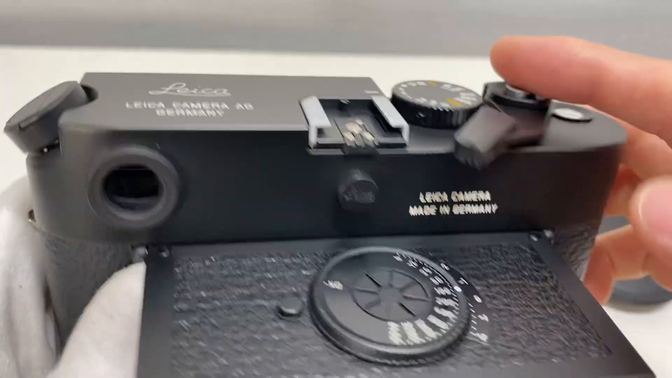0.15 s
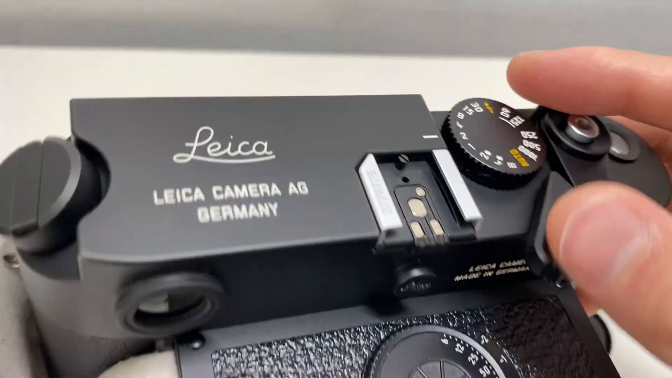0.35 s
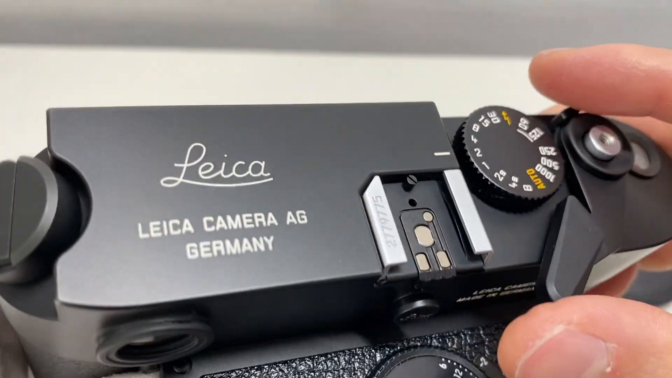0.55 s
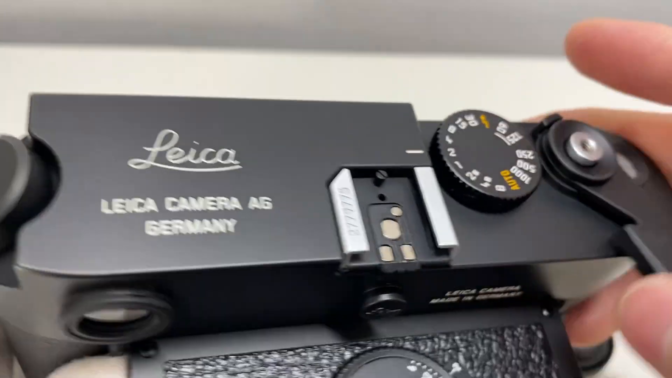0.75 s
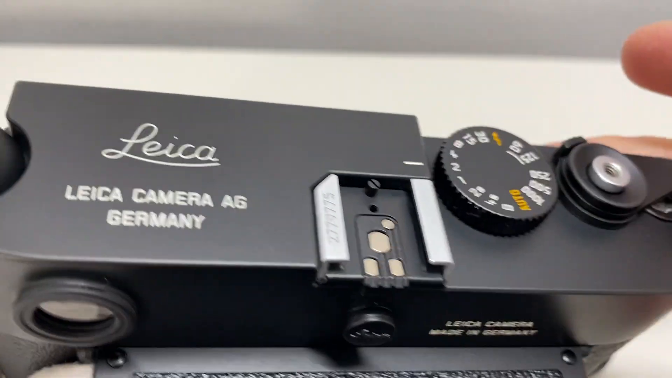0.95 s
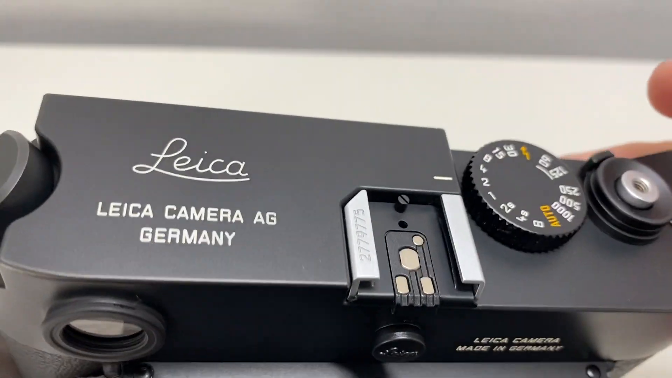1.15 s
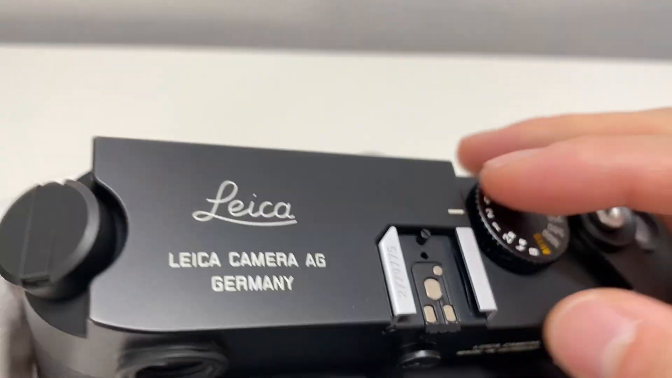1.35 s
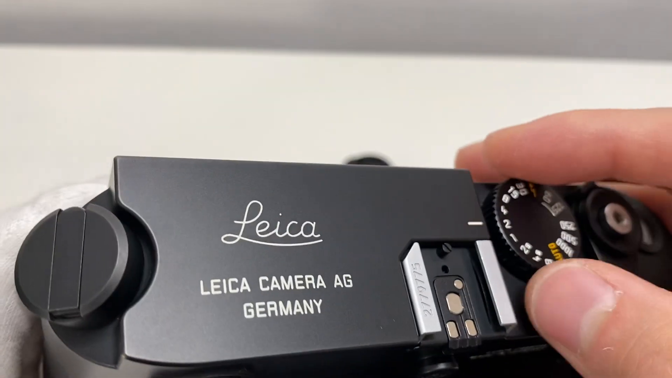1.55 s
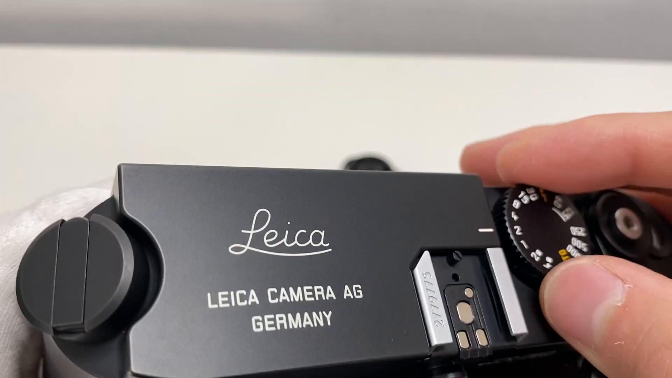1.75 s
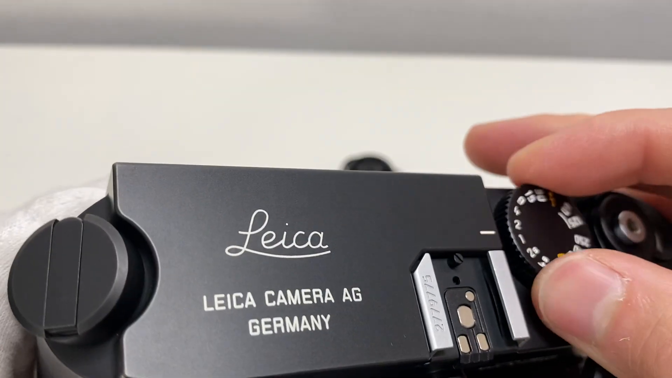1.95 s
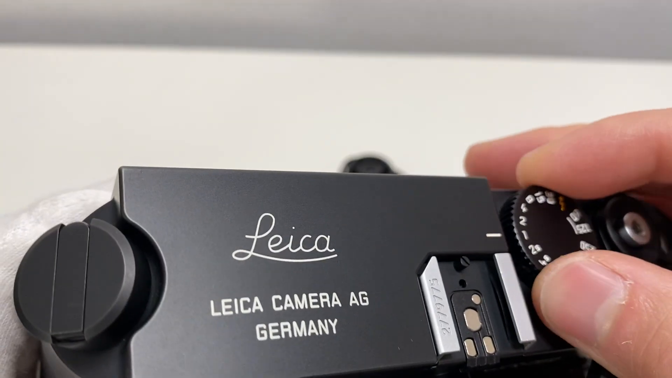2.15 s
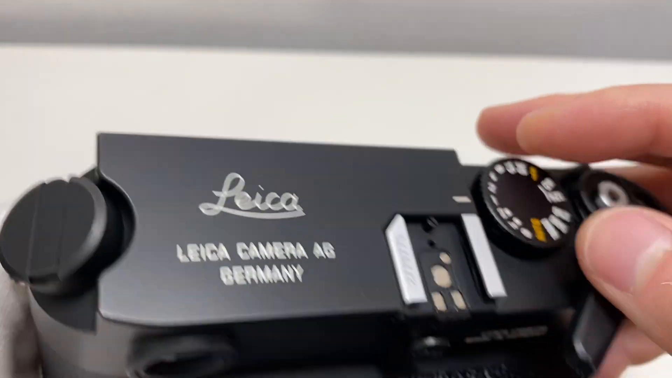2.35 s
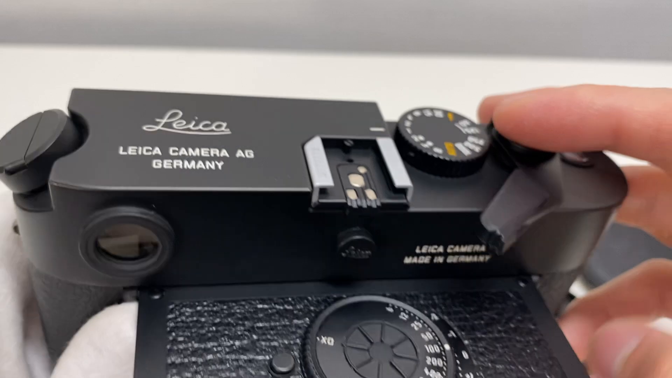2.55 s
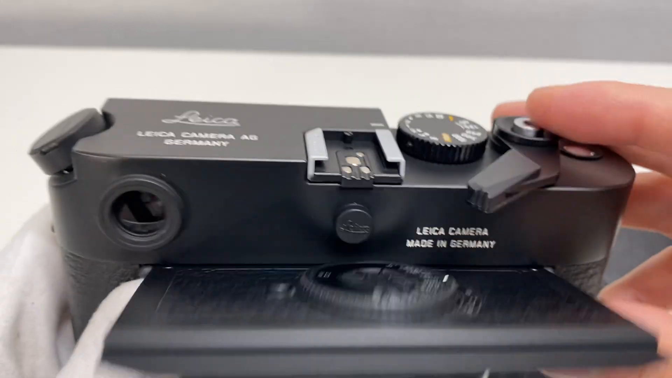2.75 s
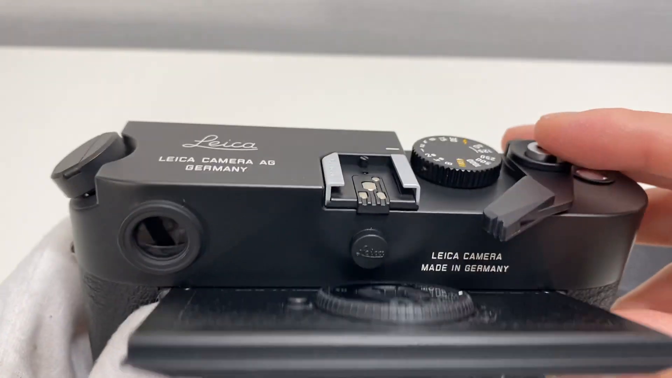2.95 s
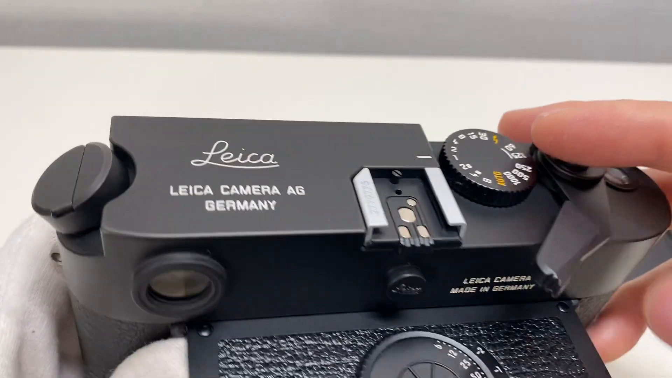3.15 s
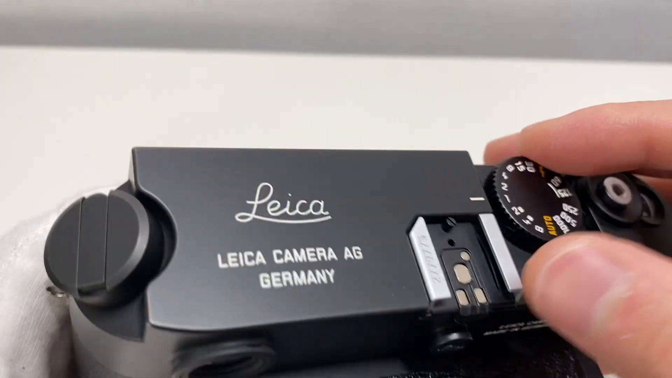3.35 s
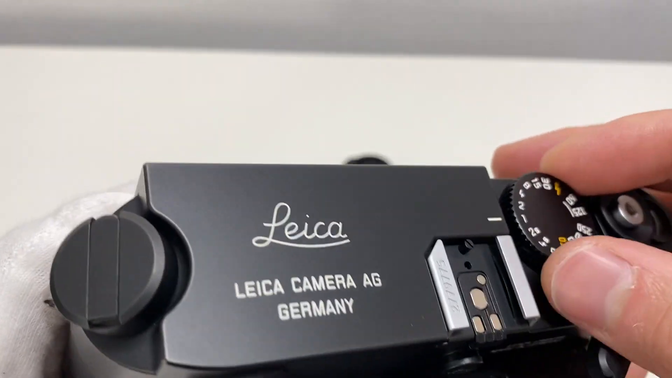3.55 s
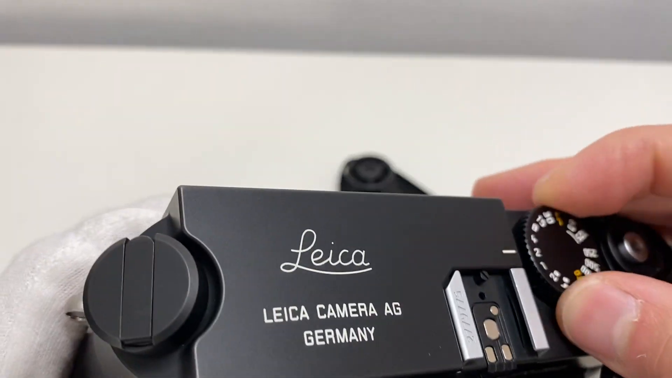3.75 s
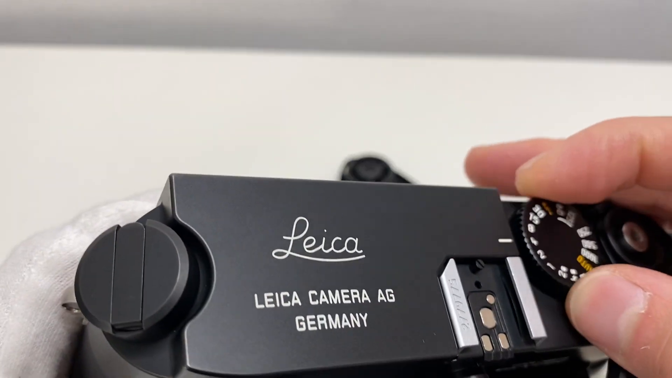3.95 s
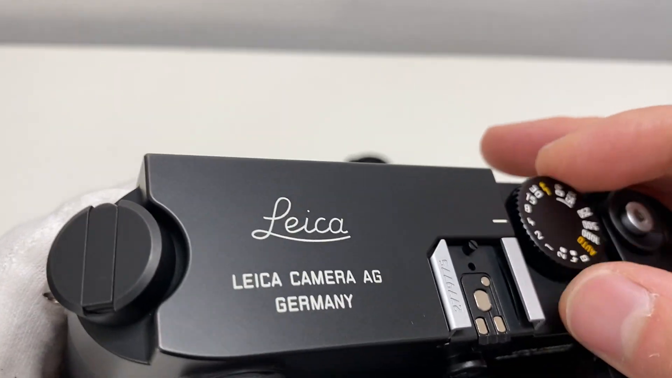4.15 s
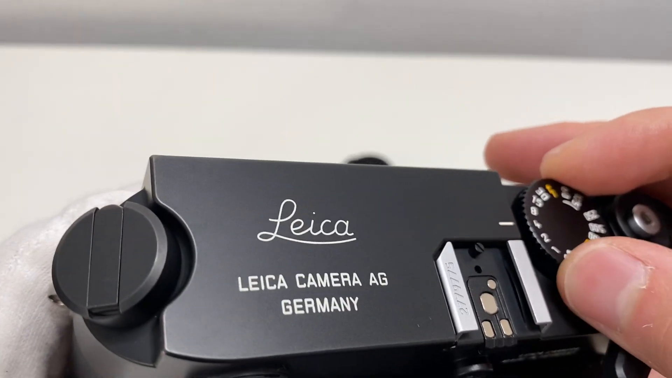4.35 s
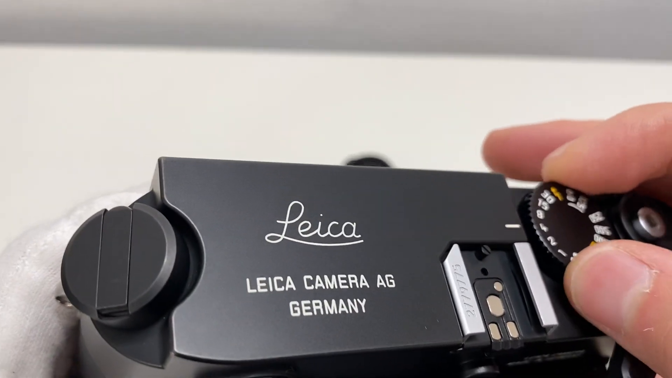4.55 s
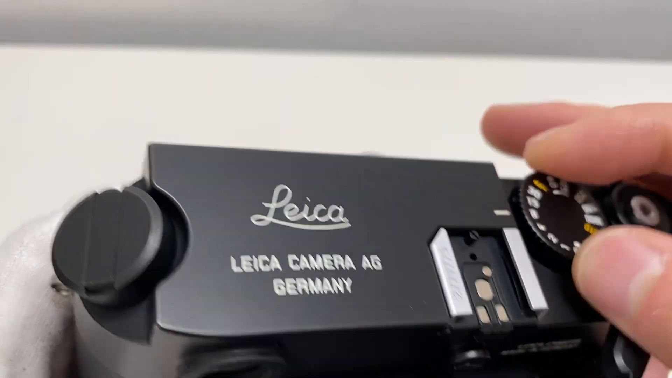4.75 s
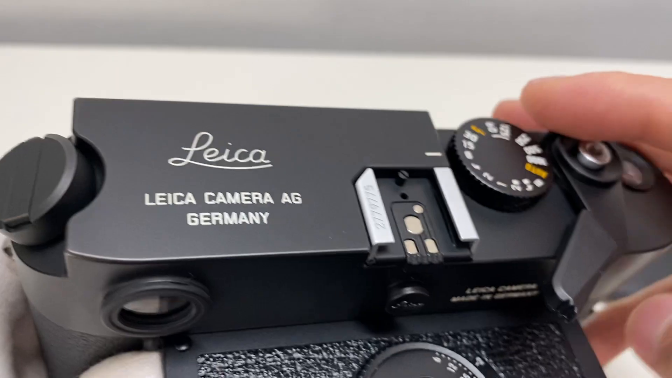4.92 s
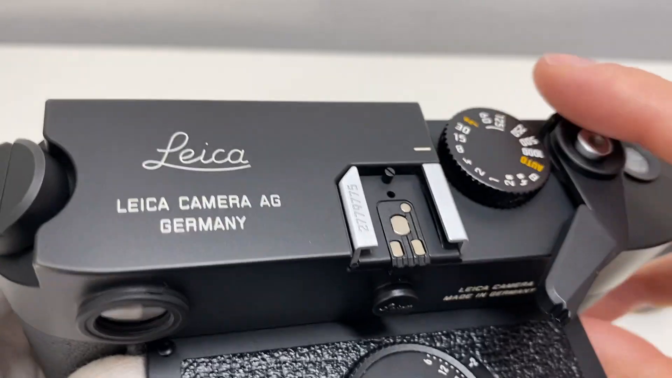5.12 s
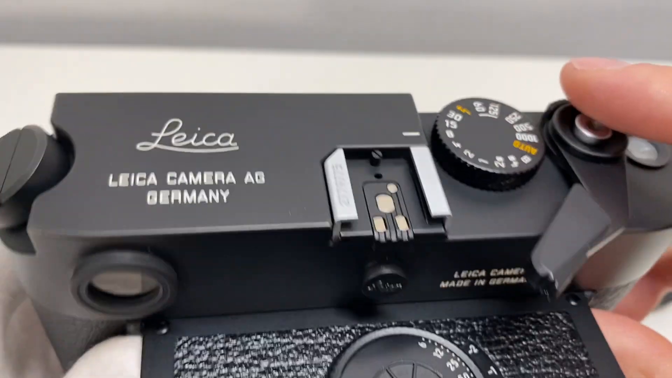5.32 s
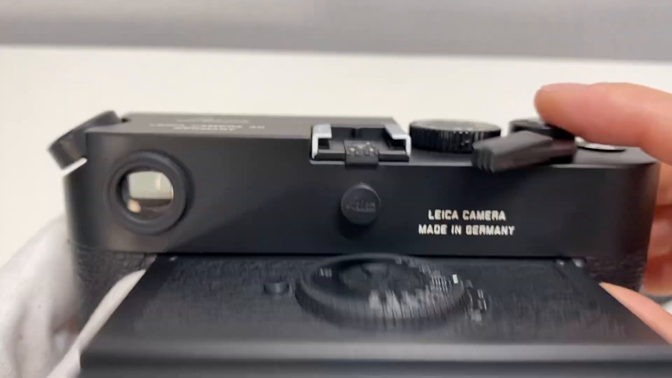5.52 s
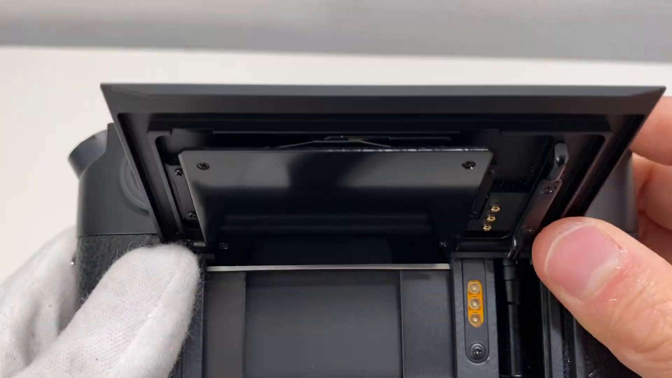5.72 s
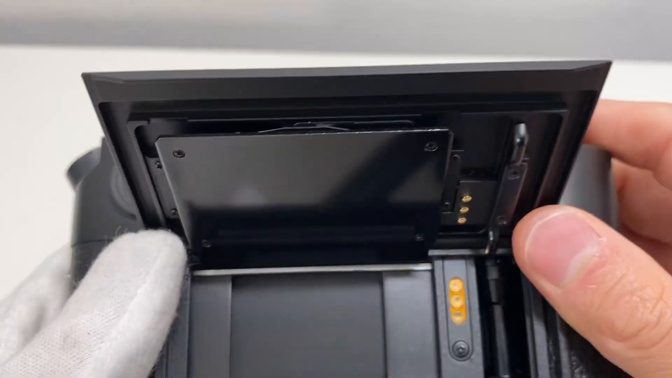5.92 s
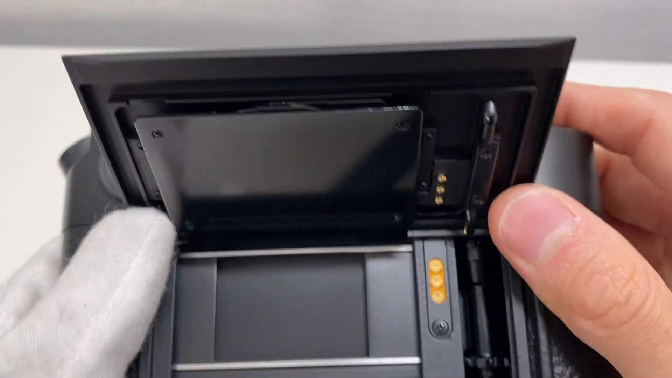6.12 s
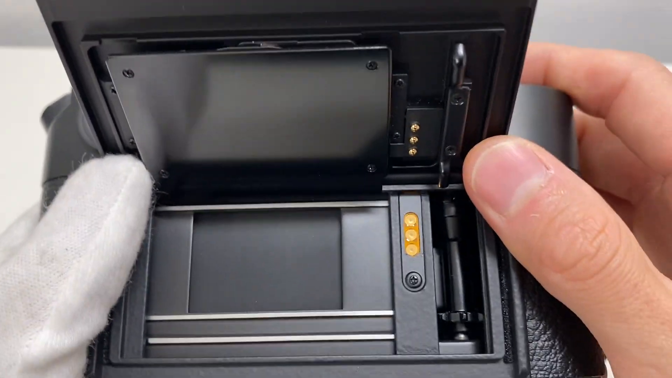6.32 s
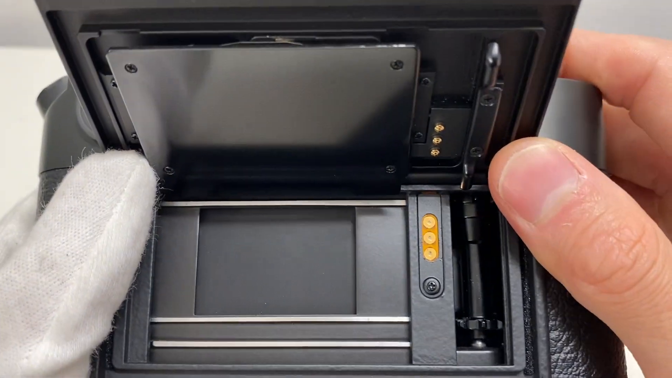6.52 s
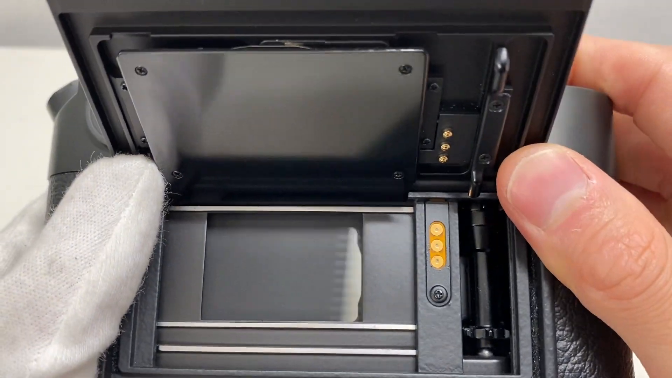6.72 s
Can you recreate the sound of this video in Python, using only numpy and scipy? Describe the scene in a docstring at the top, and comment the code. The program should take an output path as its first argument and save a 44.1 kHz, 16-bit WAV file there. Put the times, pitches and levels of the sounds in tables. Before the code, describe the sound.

Close stereo sound of small metal mechanisms, dry with a short room tail. First faint glove rubs and a tap, then a gritty lever wind ending in bright clacks and a fast ratchet return slowing into single ticks. Separate dial detents click softly for several seconds among fingertip scrapes. The loose back door thuds low, a near-quiet pause follows, and the shutter fires loudly, over soft ventilation air and a wavering low hum.

```python
"""A quiet room with a low ventilation hum; a film camera is handled close to the microphone.
The advance lever winds and ratchets home, the speed dial clicks through its detents, fingers and
a glove rub the metal, the back door bumps, and at last the shutter fires. Clicks are noise bursts
ringing through body resonances, gears and rubs are grainy noise, bumps are damped sines; the air
is filtered noise and the hum a wavering sine."""
import sys
import numpy as np
from scipy import signal
from scipy.fft import rfft, irfft, next_fast_len
from scipy.io import wavfile
from scipy.ndimage import uniform_filter1d

SR = 44100
rng = np.random.default_rng(int(sys.argv[2]) if len(sys.argv) > 2 else 0)


def store_wav(level_fs):
    """Save 16-bit WAV to argv[1]."""
    pcm = np.round(np.clip(np.atleast_2d(level_fs), -1, 1) * 32767)
    wavfile.write(sys.argv[1], SR, pcm.T.astype(np.int16))


N = 303408
TIME, FREQ = np.arange(N) / SR, np.fft.rfftfreq(N, 1 / SR)
EDGE_HZ = 16400  # upper band limit

# Click tables: [t/s, level/dB, brightness/dB]; brightness lifts the tick and lowers the knock
# Shutter release with first curtain, then second curtain
FIRST_CURTAIN_CLICKS = [(6.8423, -42, 0.3), (6.8458, -21.5, 12.5), (6.8472, -22, 6)]
SECOND_CURTAIN_CLICKS = [(6.8712, -19.5, 9.4), (6.8725, -20.5, 7.7)]
# Gears taking up the load, shutter latching, lever meeting its end stop
WINDING_CLICKS = [(.7205, -59, -3), (.7675, -38, 3.5), (.792, -27.5, 7.5), (.7998, -37, 1), (.8165, -40, 1),
                  (.8372, -39.5, 7), (.8448, -40, 3.5), (.8645, -44.5, 2.5), (1.095, -48.5, -6.5)]
LATCH_CLICKS = [(1.121, -24, 11)]
END_STOP_CLICKS = [(1.1378, -30.5, -1), (1.1428, -25, 2)]
# Returning lever: its release and its last, slow teeth
RATCHET_CLICKS = [(1.2985, -46, 0.5), (1.384, -37.5, 5), (1.4225, -47, 10), (1.4275, -42.5, 5.9),
                  (1.4617, -40, 8.9), (1.5026, -44.5, 6.4), (1.548, -45, 6.5), (1.552, -49, 3.1)]
# Detents of the speed dial
DIAL_CLICKS = [(2.0646, -40.5, 1), (3.303, -40, 3), (3.605, -48, 0), (3.7831, -40.5, 4), (3.937, -42.5, 4),
               (4.1047, -51, 4.5), (4.192, -62.5, -3), (4.2157, -57, -4), (4.7205, -41, 3.5)]
# Fingers and the loose back door tapping the body
TAP_CLICKS = [(.1961, -45.5, -3), (.3796, -54.5, -7.5), (2.857, -58.5, -14), (2.869, -58.5, -9),
              (3.1108, -43, 3), (5.74, -62.5, -14), (5.762, -62, -9.5), (6.695, -69.5, -13),
              (6.8095, -62, -1), (6.817, -59.5, -8)]
# A fingertip catching and slipping as it scrapes along
SLIP_CLICKS = [(2.672, -61.5, 4.5), (2.7032, -51.5, 7.5), (2.715, -56.5, 0)]

# Resonances of each mechanism: [f/Hz, width/Hz, level/dB]
FIRST_CURTAIN_RING = [(1760, 900, 9), (4600, 280, 12), (9600, 530, 4.6), (13900, 300, 6), (14800, 1300, 14)]
SECOND_CURTAIN_RING = [(1770, 430, 11), (3350, 470, 12.6), (5730, 1000, 18), (9656, 560, 4.4),
                       (10750, 840, 12), (14500, 900, 4.8)]
WINDING_RING = [(1933, 400, 2.5), (7470, 890, 8), (9575, 800, 8), (10560, 790, 8), (15500, 820, 3)]
RATCHET_RING = [(3510, 650, 1.3), (9000, 410, 2.9), (13420, 630, 12.5), (15100, 790, 2.7)]
DIAL_RING = [(1160, 130, 6.3), (2430, 130, 4.5), (7750, 1500, 5.6), (10400, 910, 8.3), (11400, 1700, 11),
             (14400, 880, 8.5)]
TAP_RING = [(710, 300, 11.2), (2970, 320, 5.2), (6700, 470, 0.84)]
RUB_RING = [(3180, 120, 5.7), (4000, 210, 1.5), (5250, 230, 3.6), (10000, 1200, 2.9), (14200, 490, 4.9)]
# Metal body shared by all mechanisms: broad tone [f/Hz, level/dB]
BODY_TONE = [(200, -7), (400, -7.5), (800, -0.5), (1500, -4.5), (2800, -3), (4500, -3), (6000, -4),
             (9000, -3.5), (12500, -4), (15300, -1), (16500, -12.5)]
# Ringing modes of the body: [f/Hz, width/Hz, level/dB]
BODY_MODES = [(1114, 80, 13), (1262, 70, 10), (1790, 70, 4), (1940, 200, 7.5), (2430, 310, 4),
              (3490, 300, 3.6), (5830, 80, 2.7), (6140, 80, 1.7), (6980, 100, 5.5)]
# Knock, clack and tick of a click: [low f/Hz, high f/Hz, rise/s, decay/s before scaling per mechanism]
CLICK_BANDS = [(310, 2200, .0013, 0.003), (2610, 7770, 0.00093, 0.002), (8000, 17000, 0.00039, .0014)]

# Steady run of the gears while the lever is pushed: [from t/s, to t/s]
GEAR_SPAN = (.79, 1.19)
# Gears shaking harder at the take-up and at the stop: [peak t/s, level/dB, rise/s, fall/s]
GEAR_SURGES = [(.82, -40, 0.015, 0.023), (1.137, -42.5, .008, 0.036)]
# Lever dragging softly home: [from t/s, to t/s]
DRAG_SPAN = (1.46, 1.56)

# Skin and glove sliding on the body, and the loose back door rattling near 5.77 s: [middle t/s, length/s,
# level/dB, tilt/dB per octave]
RUB_STROKES = [(.18, 0.29, -64.5, -3), (.41, 0.14, -63, 4), (2.475, 0.08, -57.5, 9.5),
               (2.57, 0.17, -64.5, -20), (2.705, 0.097, -58.5, -3), (2.83, .11, -67.5, 1),
               (3.112, .18, -63, -2), (3.592, .064, -55, 7.5), (3.765, .18, -61, -6),
               (4.313, 0.054, -72.5, 0), (4.948, 0.1, -66, 7.5), (5.135, 0.15, -65, -3.5),
               (5.27, 0.29, -74, -7.5), (5.64, .32, -72.5, -2.5), (5.765, .08, -69, -11),
               (6.29, 0.2, -83, -1)]
# Soft bumps of the whole camera: [t/s, level/dB, hardness/dB per octave]
BUMPS = [(0.803, -50, 5), (1.149, -38.5, 2.5), (5.733, -35, 1), (5.767, -33.5, -2), (6.322, -52, -7),
         (6.849, -39.5, 2.5)]
# Low modes of those bumps: [starting f/Hz, level/dB, decay/s]
BUMP_MODES = [(52, -8, .05), (91, 1.5, .024), (194, -3.5, 0.02), (380, -7, 0.012)]
# Hollow knocks of the shell: [t/s, level/dB, starting f/Hz]
SHELL_KNOCKS = [(.802, -40, 730), (2.86, -50.5, 622), (3.111, -46, 672), (5.742, -46.5, 864)]

# Room tail: [f/Hz, t60/s, level/dB]
ROOM_TAIL = [(300, 0.12, -1.5), (1100, .3, -6), (2500, .27, -8.5), (5750, 0.18, -9), (14000, 0.17, -16)]
# The two microphone ports: [f/Hz, likeness/0-1, left minus right/dB]
PORT_BALANCE = [(300, 1, 1), (1100, 0.4, 2.5), (1990, 0.6, 5.5), (3272, 0.9, 5.5), (4588, 0.4, 3.5),
                (5800, .5, 6), (7010, 0.7, 1.5), (10000, 1, -0.5), (15920, 0.8, 0)]
# Phase by which left leads; in the treble left hears the camera late: [f/Hz, lead/rad]
PORT_LEAD = [(0, 0), (800, .4), (1200, -.6), (3000, 1.2), (5000, .9), (6100, 0), (17000, -17.5)]
# Low rush of air: [f/Hz, relative level/dB per Hz]
AIR_SPECTRUM = [(15, -55), (30, -27), (45, -8), (62, -3), (80, -1), (98, -4), (118, -11), (150, -9),
                (190, -2), (250, -8), (400, -12), (600, -17), (900, -19), (1400, -36), (2800, -90)]
# Faint hiss: [f/Hz, relative level/dB per Hz]
HISS_SPECTRUM = [(600, 1.5), (1000, 3), (1900, -1), (2700, -16), (4500, -20), (8000, -25.5), (9600, -28),
                 (10000, -13), (10400, -31), (15000, -32)]
# Left-right likeness of rush and hiss: [f/Hz, likeness/0-1]
AIR_LIKENESS = [(80, 0.853), (170, 0.96), (300, .68), (500, 0.22), (1000, 0.34), (8000, 0.1)]
# Ventilation hum: [t/s, level/dB]
HUM_LEVEL = [(0, -61.5), (3.3, -61), (3.9, -55), (4.8, -50), (6.1, -55.5), (6.88, -52.5)]


def shutter():
    """The two curtains snap across, one after the other."""
    first = clicks(FIRST_CURTAIN_CLICKS, FIRST_CURTAIN_RING, clack_db=-1.3, decay_scale=0.78,
                   rattle_db=-21.5, rattle_s=0.023)
    second = clicks(SECOND_CURTAIN_CLICKS, SECOND_CURTAIN_RING, clack_db=7.0, decay_scale=0.39,
                    rattle_db=-29, rattle_s=0.0072)
    return first + second


def gear_teeth(count=3, first_s=.9135, gap_s=.0573, level_db=-49.5, bright_db=-0.8):
    """Turning gears tick at even spacing."""
    return [(first_s + k * gap_s, level_db, bright_db) for k in range(count)]


def lever_wind():
    """The gears take up the load, turn, latch the shutter and hit the stop."""
    gears = clicks(WINDING_CLICKS + gear_teeth(), WINDING_RING, clack_db=3.0, decay_scale=1.1,
                   rattle_db=-29.5, rattle_s=.016)
    latch = clicks(LATCH_CLICKS, WINDING_RING, clack_db=-1.5, decay_scale=1.1,
                   rattle_db=-27, rattle_s=0.014)
    stop = clicks(END_STOP_CLICKS, WINDING_RING, clack_db=7, decay_scale=1.1,
                  rattle_db=-32, rattle_s=.016)
    effort = hold(*GEAR_SPAN, db=-57, fade_s=.03)
    effort = effort + sum(surge(*row) for row in GEAR_SURGES)
    return gears + latch + stop + whirr(effort, WINDING_RING, tilt_db=-6, rough_db=4.5)


def lever_return(release_s=1.293, full_speed_teeth_per_s=148, pawl_db=-40.5, pawl_bright_db=12):
    """The thumb lets go: the lever's speed sets the pawl's rate and strength and the whirr."""
    speed = surge(peak=1.3388, db=0, rise_s=.034, fall_s=.046) * (TIME > release_s)
    travel = np.cumsum(speed) / SR
    # count teeth from the point of full speed
    passed = np.floor((travel - travel[np.argmax(speed)]) * full_speed_teeth_per_s)
    teeth = [(TIME[i], pawl_db + 20 * np.log10(speed[i]), pawl_bright_db)
             for i in np.flatnonzero(np.diff(passed))]
    drag = hold(*DRAG_SPAN, db=-63.5, fade_s=.028)
    motion = amp(-38.5) * speed ** 1.28 + drag
    grind = whirr(motion, RATCHET_RING, tilt_db=-0.55, rough_db=4.0)
    pawl = clicks(RATCHET_CLICKS + teeth, RATCHET_RING, clack_db=1.0, decay_scale=0.92,
                  rattle_db=-24, rattle_s=.012)
    return grind + pawl


def dial(tail_after_s=0.032, tail_s=.1, tail_db=-25.5, tail_tilt_db=0.2):
    """The speed dial drops into its detents; each click is followed by a short, soft, noisy tail."""
    tails = [(s + tail_after_s, tail_s, db + tail_db, tail_tilt_db) for s, db, _ in DIAL_CLICKS]
    detents = clicks(DIAL_CLICKS, DIAL_RING, clack_db=-4.5, decay_scale=1.0,
                     rattle_db=-24.0, rattle_s=0.02)
    return detents + rubs(tails)


def hands():
    """Fingers and the glove tap, scrape and rub the body; the loose back door rattles briefly."""
    taps = clicks(TAP_CLICKS, TAP_RING, clack_db=-0.5, decay_scale=0.45,
                  rattle_db=-13.0, rattle_s=0.009)
    slips = clicks(SLIP_CLICKS, RUB_RING, clack_db=7, decay_scale=0.92,
                   rattle_db=-11.5, rattle_s=0.0089)
    return taps + slips + rubs(RUB_STROKES, rough_db=3.5)


def rubs(strokes, rough_db=1.0, swell=0.69):
    """Short strokes of grainy noise, as of skin and cloth, swell and fade through the body."""
    out = np.zeros((2, N))
    for middle, length, db, tilt_db in strokes:
        size = 2 * int(length * SR / 2)
        hz = np.fft.rfftfreq(size, 1 / SR)
        tone_db = colour(RUB_RING, hz) + struck(hz, spread_db=2.0, width=1000)
        tone_db = tone_db + tilt_db * np.log2(1 + hz / 1500)
        gain = amp(tone_db) * hz / (hz + 1200) * (hz < EDGE_HZ)
        # roughness is drawn over one second, then cut to the stroke
        noise = grainy(rough_db, SR)[:, :size]
        stroke = unit(irfft(rfft(noise) * gain))
        add(out, middle - length / 2, amp(db) * stroke * np.hanning(size) ** swell)
    return out


def thumps(knock_decay_s=0.012):
    """The camera rocks in the hands, harder bumps favouring its higher modes; the shell knocks."""
    out = np.zeros((2, N))
    for s, db, hard_db in BUMPS:
        for hz, mode_db, decay in BUMP_MODES:
            mode_level = db + mode_db + hard_db * np.log2(hz / 100)
            add(out, s, amp(mode_level) * swing(hz, decay))
    for s, db, hz in SHELL_KNOCKS:
        add(out, s, amp(db) * swing(hz, knock_decay_s))
    return out


def room(x, onset_s=0.00071):
    """A small room: a short diffuse tail, weaker and mostly quicker in the treble."""
    hz, t, z = signal.stft(rng.standard_normal((2, SR // 2)), SR, nperseg=256)
    decay = amp(-60 * t / read(ROOM_TAIL, hz)[:, None]) * (1 - np.exp(-(t / onset_s) ** 2))
    # even out the energy of every band before setting its level
    energy = np.sqrt(np.mean(decay ** 2, axis=1, keepdims=True) * SR / 2)
    decay *= amp(read(ROOM_TAIL, hz, axis=2))[:, None] / energy
    tail = signal.istft(z * decay, SR)[1]
    return signal.fftconvolve(x, tail, axes=1)[:, :N]


def ports(x):
    """The near camera reaches the two ports with different strength and delay."""
    size = 2 * next_fast_len(N // 2 + SR // 10)
    hz = np.fft.rfftfreq(size, 1 / SR)
    z = pair(rfft(x, size), read(PORT_BALANCE, hz))
    # half of the difference goes to each side
    half = amp(read(PORT_BALANCE, hz, axis=2) / 2)
    lead = np.exp(1j * np.interp(hz, *np.transpose(PORT_LEAD)) / 2)
    sides = np.array([half * lead, 1 / (half * lead)])
    sides = sides / np.sqrt((half ** 2 + half ** -2) / 2)
    return irfft(z * sides)[:, :N]


def room_tone(air_db=-54, hiss_db=-69, hum_hz=78.4, waver_hz=4.0, throb_db=-1.0):
    """Low rush of air and faint hiss as filtered noise, and a fan hum wavering in pitch and level."""
    out = np.zeros((2, N))
    for spectrum, db in ((AIR_SPECTRUM, air_db), (HISS_SPECTRUM, hiss_db)):
        z = pair(rfft(rng.standard_normal((2, N))), read(AIR_LIKENESS, FREQ))
        out += amp(db) * unit(irfft(z * amp(read(spectrum, FREQ)), N))
    # two slow random curves, one for pitch and one for level
    slow = rfft(rng.standard_normal((2, N))) * np.exp(-(FREQ / 8) ** 2)
    drift, swell = unit(irfft(slow, N))
    hum = unit(np.sin(2 * np.pi * np.cumsum(hum_hz + waver_hz * drift) / SR))
    return out + level(HUM_LEVEL) * amp(throb_db * swell) * hum


def clicks(rows, ring, clack_db, decay_scale, rattle_db, rattle_s, size=4096):
    """Blows chatter into the body as knock, clack and tick; treble rises first, small parts rattle on."""
    t, hz = np.arange(size) / SR, np.fft.rfftfreq(size, 1 / SR)
    out = np.zeros((2, N))
    for k, (low, high, rise, decay) in enumerate(CLICK_BANDS):
        fall = np.exp(-t / (decay * decay_scale)) + amp(rattle_db) * np.exp(-t / rattle_s)
        envelope = (1 - np.exp(-(t / rise) ** 2)) * fall
        envelope /= envelope.max()
        band = ((1 + (low / (hz + 1)) ** 10) * (1 + (hz / high) ** 10)) ** -.5
        gain = band * amp(colour(ring, hz))
        for s, db, bright_db in rows:
            response = causal(gain * amp(struck(hz, spread_db=3.0, width=170)))
            blow = unit(irfft(rfft(chatter(envelope)) * response))
            blow = blow * np.sqrt(np.mean(envelope ** 2))
            band_db = (-bright_db, clack_db, bright_db)[k]
            add(out, s, amp(db + band_db) * blow)
    return out


def whirr(envelope, ring, tilt_db, rough_db):
    """Fine gear teeth grind through the clicks' resonances, and many small parts ring along."""
    small_parts = struck(FREQ, spread_db=2.5, width=90)
    tone_db = colour(ring, FREQ) + small_parts + tilt_db * np.log2(1 + FREQ / 1500)
    gain = amp(tone_db) * FREQ / (FREQ + 400) * (FREQ < EDGE_HZ)
    return envelope * unit(irfft(rfft(grainy(rough_db, N)) * gain, N))


def grainy(rough_db, size):
    """Friction: noise whose strength jumps from one millisecond to the next."""
    grain = unit(uniform_filter1d(rng.standard_normal(size), size=44))
    return rng.standard_normal((2, size)) * amp(rough_db * grain)


def chatter(envelope, count=3):
    """A burst of tiny metal contacts, nearly even in spectrum, under an envelope."""
    burst = rng.standard_normal((2, len(envelope))) * envelope
    for _ in range(count):
        # flatten the spectrum, then gate the burst again
        flat = irfft(np.exp(1j * np.angle(rfft(burst))))
        burst = flat * np.minimum(envelope * 10, 1)
    return burst


def struck(hz, spread_db, width=260):
    """Each blow lands on another spot and favours other modes: a random ripple in dB."""
    ripple = uniform_filter1d(rng.standard_normal(len(hz)), size=max(int(width / hz[1]), 1))
    return spread_db * unit(uniform_filter1d(ripple, size=9))


def swing(hz, decay, rise_s=0.001, sag=0.19):
    """A damped low swing whose pitch sags."""
    t = np.arange(SR // 2) / SR
    turns = np.cumsum(hz * (1 - sag * (1 - np.exp(-t / decay)))) / SR
    return np.sin(2 * np.pi * turns) * (1 - np.exp(-t / rise_s)) * np.exp(-t / decay)


def colour(ring, hz):
    """Response in dB of the body with one mechanism's resonances on top."""
    peaks = sum(db / (1 + (2 * (hz - f) / width) ** 2) for f, width, db in BODY_MODES + ring)
    return read(BODY_TONE, hz) + peaks


def causal(gain):
    """Minimum-phase spectrum of a gain: it rings after the blow, never before."""
    log_gain = np.log(np.maximum(gain, 1e-4))
    mirrored = np.r_[log_gain, log_gain[-2:0:-1]]
    return np.exp(np.conj(signal.hilbert(mirrored)))[:len(gain)]


def pair(z, same):
    """Makes two unrelated spectra partly alike."""
    same = np.clip(same, 0, 1)
    return np.array([z[0], same * z[0] + np.sqrt(1 - same ** 2) * z[1]])


def hold(start, end, db, fade_s):
    """Gain over time: fades in, holds from start to end, fades out."""
    outside = np.maximum(np.maximum(start - TIME, TIME - end), 0)
    return amp(db) * np.exp(-outside / fade_s)


def surge(peak, db, rise_s, fall_s):
    """Gain over time: swells to a peak and dies away."""
    return amp(db) * np.exp(-np.maximum((peak - TIME) / rise_s, (TIME - peak) / fall_s))


def level(curve):
    """Gain over time from (t/s, level/dB) rows, silent outside them."""
    return amp(np.interp(TIME, *np.transpose(curve), left=-np.inf, right=-np.inf))


def read(points, hz, axis=1):
    """One column of a table over log frequency."""
    table = np.array(points, float)
    return np.interp(np.log(hz + 1), np.log(table[:, 0] + 1), table[:, axis])


def amp(db):
    """Decibels to linear gain."""
    return 10 ** (np.asarray(db) / 20)


def unit(x):
    """Scales each channel to an RMS of one."""
    return x / np.sqrt(np.mean(x ** 2, axis=-1, keepdims=True) + 1e-20)


def add(mix, s, sound):
    """Lays a sound into the mix from s seconds on, cut at the end."""
    part = mix[:, max(round(s * SR), 0):][:, :sound.shape[-1]]
    part += sound[..., :part.shape[1]]


def scene():
    """The camera and its room tail pass the ports; bumps and room tone are added straight."""
    background = room_tone() + thumps()
    camera = shutter() + lever_wind() + dial() + hands() + lever_return()
    return ports(camera + room(camera)) + background


def record(dry):
    """The recorder's band limit: a steep low-pass."""
    lowpass = signal.firwin(255, EDGE_HZ, window=("kaiser", 9), fs=SR)
    return signal.oaconvolve(dry, lowpass[None], "same")


dry = scene()
out = record(dry)
store_wav(out)
```